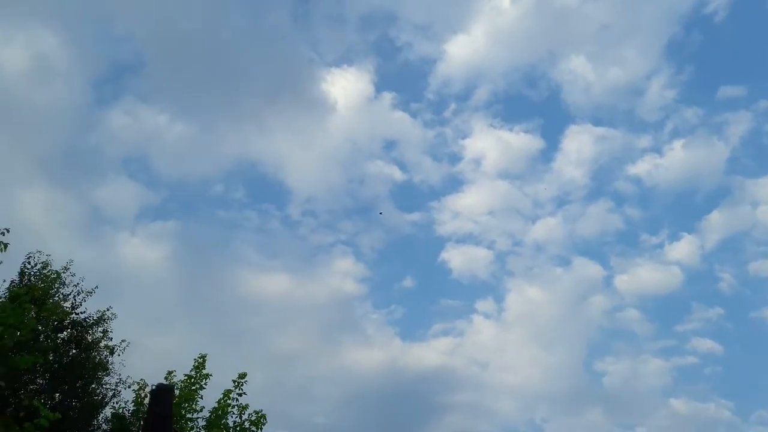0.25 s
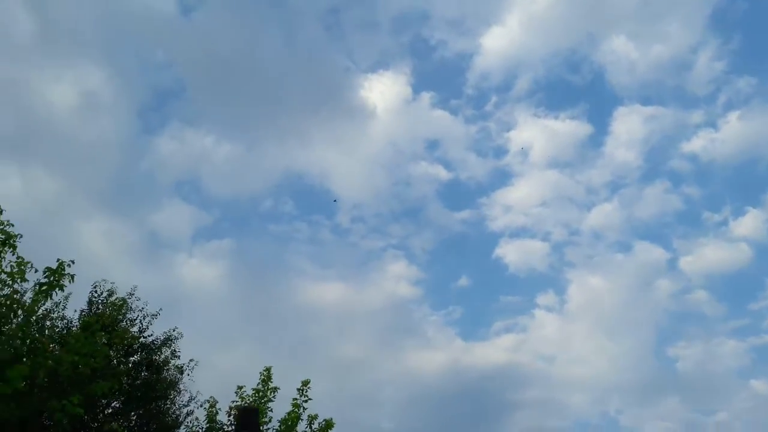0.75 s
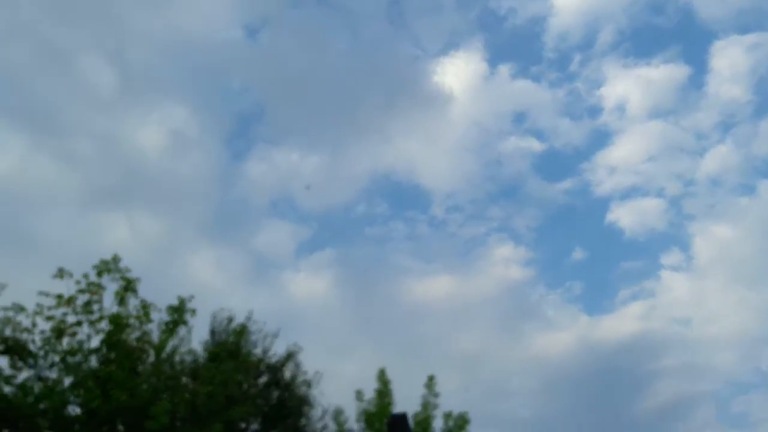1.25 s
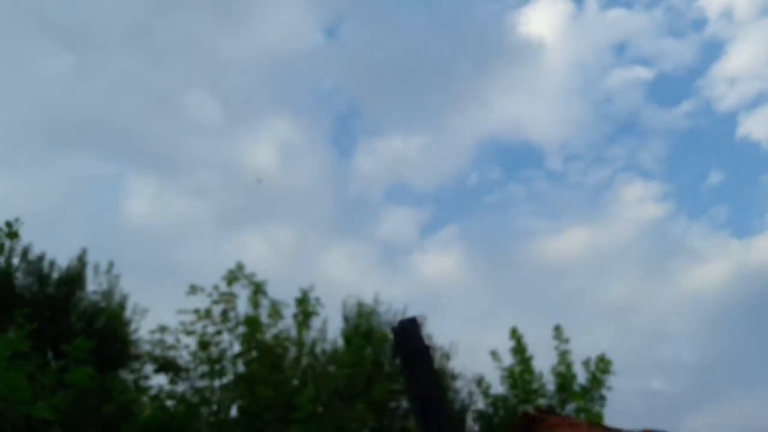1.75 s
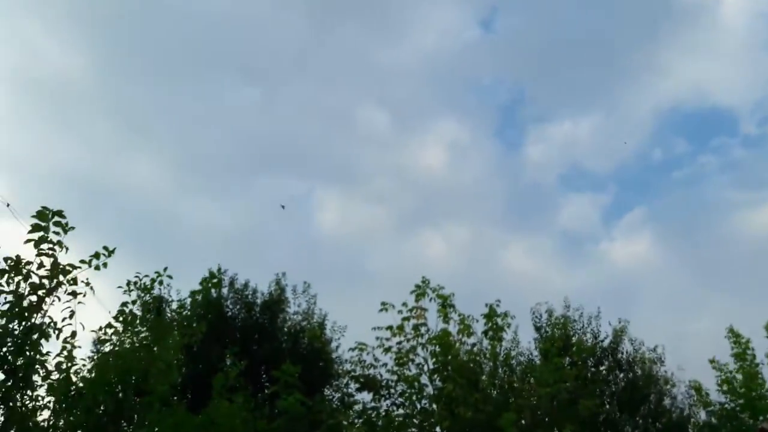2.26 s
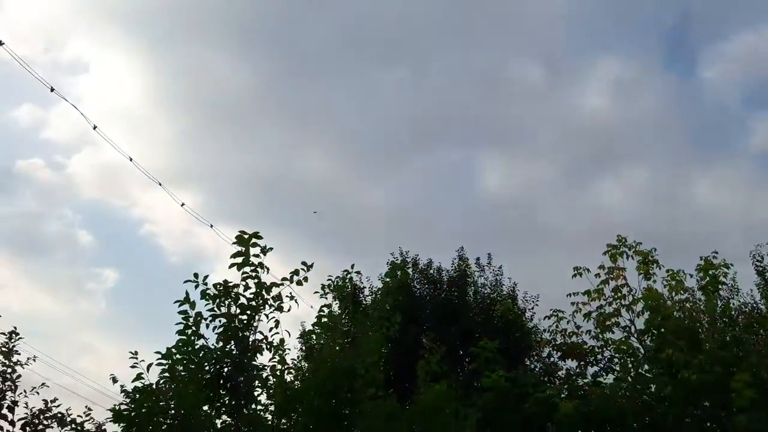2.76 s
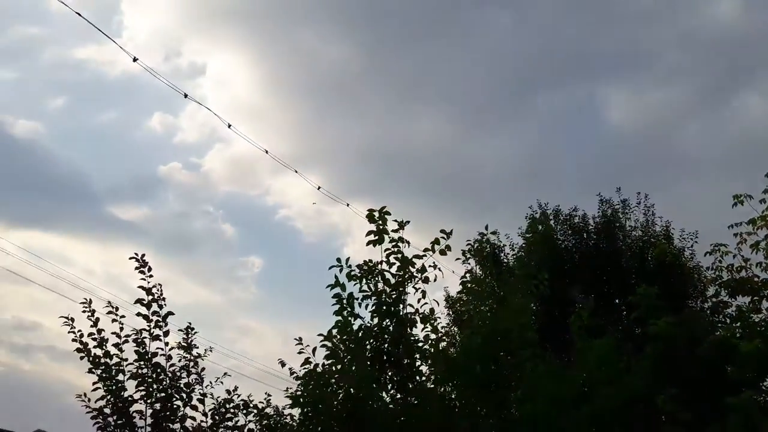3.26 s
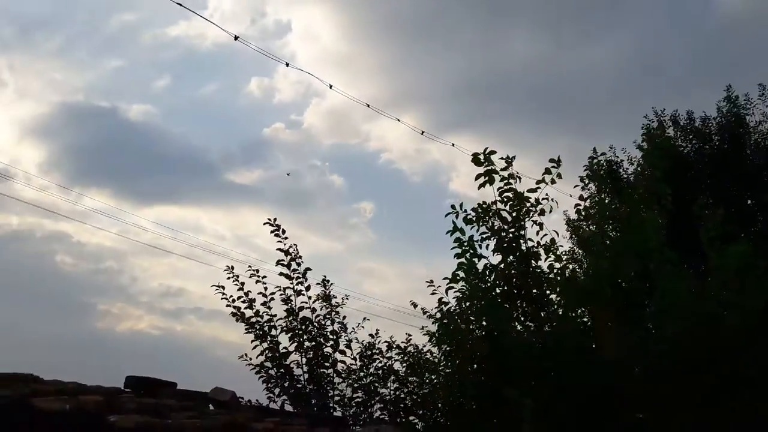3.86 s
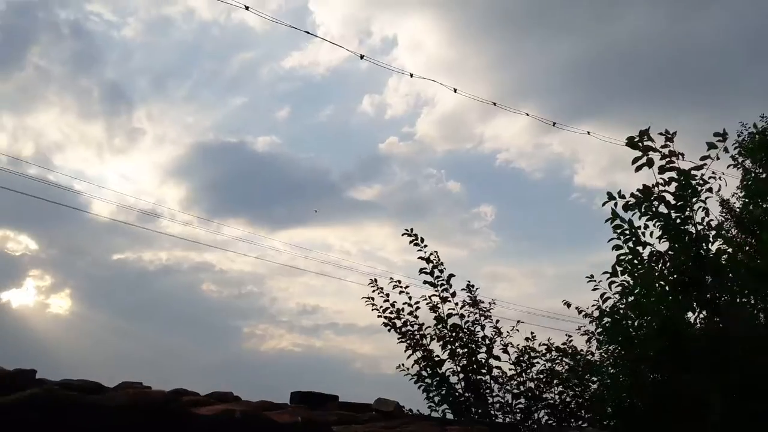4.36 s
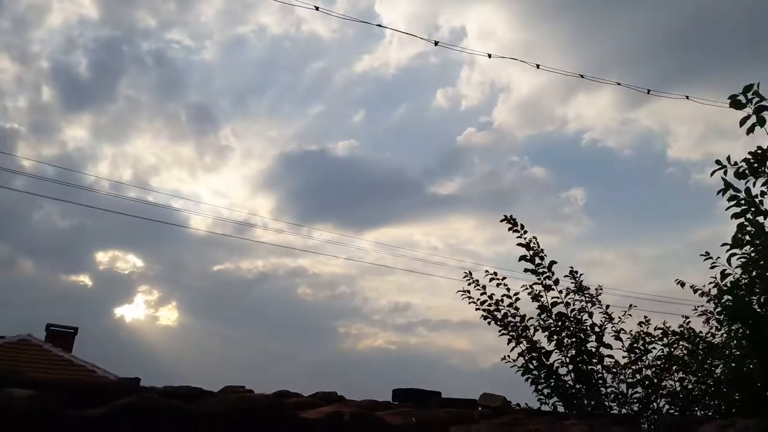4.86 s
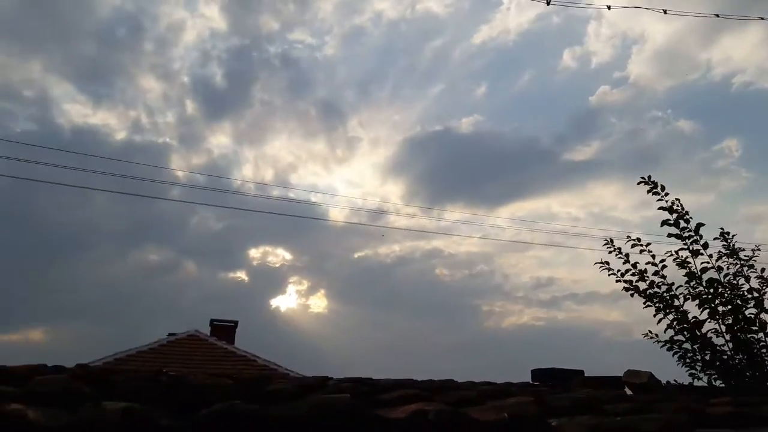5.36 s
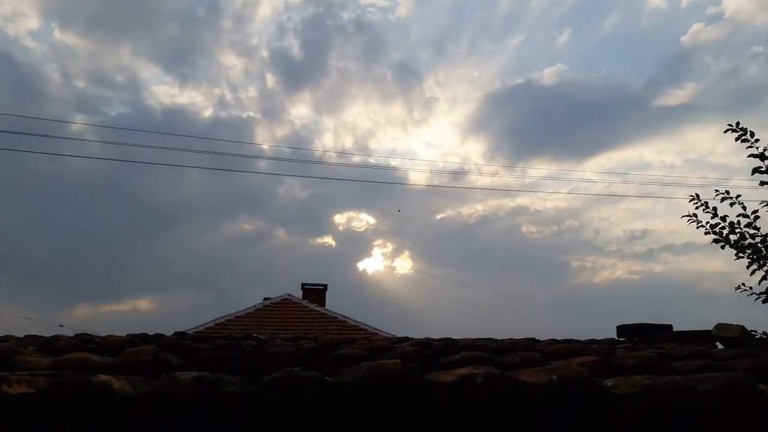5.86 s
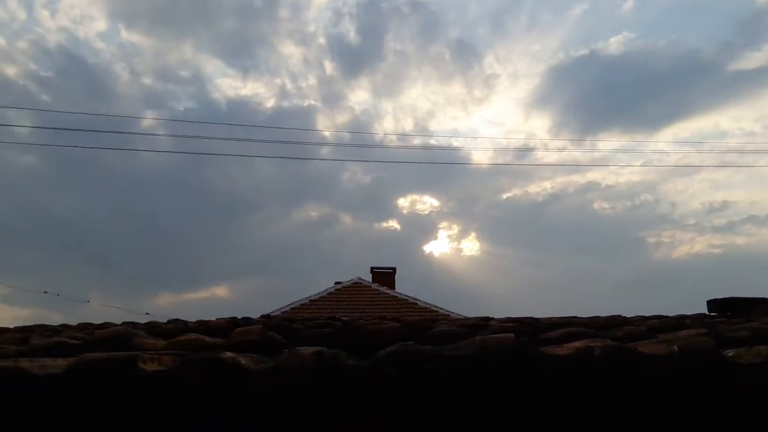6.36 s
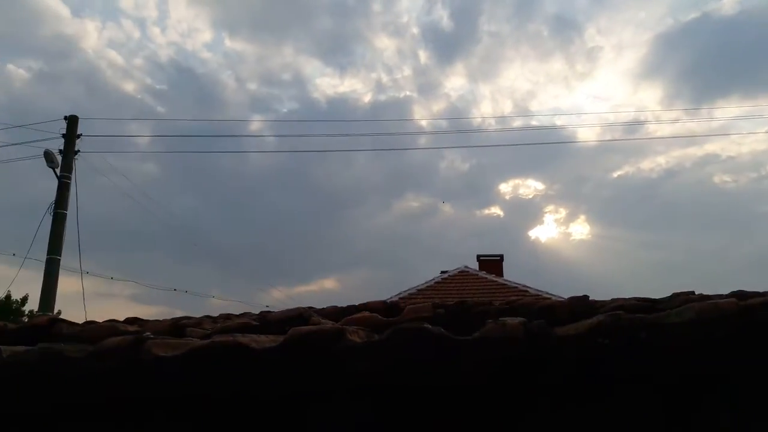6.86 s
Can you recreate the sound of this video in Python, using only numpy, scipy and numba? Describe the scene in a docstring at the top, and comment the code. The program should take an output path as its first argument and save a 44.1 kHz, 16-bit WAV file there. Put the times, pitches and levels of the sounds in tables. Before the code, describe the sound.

Faint young-pigeon peeps, wing rustles and claps over a low outdoor hum, then violent low wind buffeting swamps the microphone from about 5.2 seconds.

```python
"""Wind buffets the two microphone ports of a hand-held phone in a village yard under a pigeon loft.
Low-passed noise and torn pressure pulses make the wind; resonant noise makes wings rustle and clap.
Young pigeons peep with swept sines and hoarse noise chirps, an adult coos softly on a pitch and its octave.
Damped sines knock a wooden perch once; flickering noise bands are the village hum and microphone hiss."""
import sys
import numpy as np
from scipy import signal
from scipy.io import wavfile
from scipy.ndimage import uniform_filter1d
from numba import njit

SR = 44100
rng = np.random.default_rng(int(sys.argv[2]) if len(sys.argv) > 2 else 0)


def persist_wave(psi):
    """Save psi, clipped to +-1, as 16-bit WAV."""
    counts = np.round(np.clip(psi, -1, 1) * 32767).astype(np.int16)
    wavfile.write(sys.argv[1], SR, np.atleast_2d(counts).T)


N = 313110  # samples, 7.1 s

# whistles of young pigeons, levels ahead of the loft walls:
# (time [s], length [s], start [Hz], middle [Hz], end [Hz], level [dB])
PEEP_CALLS = [(0.0, 0.1, 5040, 4650, 4940, -67), (0.0, 0.1, 4170, 4170, 3950, -72),
              (0.1, 0.09, 4950, 4900, 4990, -72.5), (0.19, 0.05, 5050, 4880, 4740, -72),
              (0.259, 0.12, 4720, 4830, 4870, -64), (0.653, 0.096, 3820, 4100, 4300, -72),
              (0.756, 0.05, 5080, 4840, 4530, -71.5), (0.803, .07, 4260, 4420, 4610, -66),
              (0.806, 0.11, 4740, 4790, 4680, -74), (0.873, 0.086, 4520, 4380, 4260, -66.5),
              (0.973, 0.044, 4680, 4760, 4560, -66), (1.029, 0.034, 4260, 4260, 4150, -65.5),
              (1.782, 0.045, 4490, 4400, 4250, -69.5), (1.852, 0.016, 4500, 4540, 4630, -70),
              (2.17, 0.11, 4500, 4430, 4530, -72), (2.323, 0.05, 4680, 4590, 4610, -66.5),
              (2.389, 0.095, 4370, 4360, 4160, -71), (2.502, 0.053, 4680, 4790, 4730, -74),
              (2.587, 0.036, 4260, 4030, 3410, -66), (3.159, 0.042, 4030, 4070, 4270, -73),
              (3.216, 0.039, 3980, 4030, 4260, -69), (3.22, 0.21, 4850, 4880, 5070, -81),
              (3.337, 0.05, 4520, 4380, 4310, -73.5), (3.381, 0.14, 4530, 4500, 4620, -72.5),
              (3.455, 0.044, 4250, 4200, 4410, -68), (3.5, 0.062, 4490, 4500, 4500, -67.5),
              (3.568, 0.046, 4980, 4840, 4560, -67), (3.619, 0.038, 4470, 3740, 3470, -64.5),
              (3.84, 0.02, 3400, 3580, 3500, -66), (4.083, 0.14, 4150, 4360, 4450, -69.5),
              (4.238, 0.11, 4660, 4830, 4800, -72), (4.341, 0.068, 4370, 3900, 3860, -61.5),
              (4.419, 0.044, 3900, 4080, 3900, -64), (4.708, 0.049, 4440, 4360, 4360, -69),
              (5.43, 0.095, 3940, 4040, 3940, -74.5), (5.621, 0.097, 4240, 4440, 3940, -69),
              (5.737, 0.12, 4086, 4175, 4140, -67), (5.867, 0.068, 4290, 4210, 4100, -64.5),
              (5.42, 0.1, 4520, 4600, 4520, -76.5), (5.944, 0.12, 4040, 4010, 4040, -66.5),
              (6.08, 0.14, 4190, 4405, 4380, -63.5), (6.214, 0.038, 4500, 4160, 3770, -68),
              (6.716, 0.095, 4360, 4360, 4500, -71), (6.82, 0.12, 4410, 4380, 4590, -68.5),
              (6.96, 0.074, 4730, 5000, 4760, -72), (7.05, .06, 4170, 4200, 4250, -72)]


def undb(db):
    """Level definition: the amplitude gain of a level in dB."""
    return 10 ** (np.asarray(db) / 20)


def unit(x):
    """Normalization by the root mean square: scale to rms 1."""
    return x / np.sqrt(np.mean(x ** 2))


def curves(table):
    """Linear interpolation: columns of a table joined by straight lines, sample by sample."""
    s, *columns = np.transpose(table)
    return [np.interp(np.arange(N) / SR, s, column) for column in columns]


def sides(pan_db):
    """Power conservation: gains with left pan_db above right, for the power of unrelated ports."""
    left_power = undb(np.asarray(pan_db, float)) ** 2
    ratio = np.array([left_power, left_power ** 0])
    return np.sqrt(2 * ratio / (1 + left_power))


@njit
def svf(x, hz, damp):
    """Second-order resonance: state-variable filter with a moving centre; returns low, band and high."""
    y = np.empty((3, len(x)))
    band_state, low_state = 0., 0.
    for i in range(len(x)):
        g = np.tan(np.pi * hz[i] / SR)
        v = (band_state + g * (x[i] - low_state)) / (1 + g * (g + damp))
        low = low_state + g * v
        band_state, low_state = 2 * v - band_state, 2 * low - low_state
        y[0, i], y[1, i], y[2, i] = low, damp * v, x[i] - damp * v - low
    return y


def band(x, hz, width_hz):
    """Fixed resonance, gain 1 at the centre."""
    b, a = signal.iirpeak(hz, hz / width_hz, fs=SR)
    return signal.lfilter(b, a, x)


def twice_band(x, hz, width_hz):
    """Cascaded resonance: two equal passes steepen the skirts; the width is that of each pass."""
    return band(band(x, hz, width_hz), hz, width_hz)


def walk(rate):
    """Smoothed random process: levels held 1 / rate s and averaged twice; spread 1."""
    hold = int(SR / rate)
    steps = np.repeat(rng.standard_normal(N // hold + 1), hold)
    smooth = uniform_filter1d(uniform_filter1d(steps, hold), hold)[:N]
    return smooth / np.std(smooth)


def add(out, s, sound):
    """Linear superposition: mix a short sound in at time s."""
    i = max(int(s * SR), 0)
    n = max(min(sound.shape[1], N - i), 0)
    out[:, i:i + n] += sound[:, :n]


def buffeting(base_hz=290, octaves_per_db=0.05, burst_db=2.5, dips_per_s=70, dip_db=-7, dip_small=1.66):
    """Turbulence: eddies roll over each port alone and suck short dips; harder gusts make them smaller."""
    # wind on the ports ahead of their roll-off: (time [s], left level [dB], right level [dB])
    gust = [(0, -58, -62), (.55, -54, -48.5), (.68, -50, -43), (.76, -40, -35), (.85, -42.5, -48.5),
            (1.0, -55.5, -56), (1.36, -51, -48), (1.43, -46, -31), (1.5, -41, -31.5), (1.55, -36.5, -38),
            (1.65, -41, -39.5), (1.72, -42.5, -28), (1.78, -39, -34.5), (1.87, -39.5, -35.5),
            (2.0, -44.5, -45), (2.15, -65, -52), (2.3, -70, -69), (2.95, -57.5, -64), (3.3, -63, -70),
            (3.4, -44.5, -73), (3.52, -45, -44.5), (3.79, -41.5, -56), (3.9, -59, -62), (4.02, -49, -57.5),
            (4.44, -62, -66), (5.1, -62.5, -67), (5.22, -40, -38.5), (5.29, -26.5, -28.5), (5.35, -38, -41),
            (5.41, -33, -25), (5.45, -29, -18.5), (5.54, -28, -33), (5.58, -17.5, -23), (5.62, -22, -26.5),
            (5.71, -21, -28.5), (5.8, -36, -17.5), (5.85, -22, -22), (5.88, -27, -35), (5.92, -23.5, -25.5),
            (5.99, -29.5, -39), (6.11, -29.5, -56), (6.15, -24.5, -25.5), (6.19, -29, -14),
            (6.24, -31, -16.5), (6.28, -23.5, -20), (6.36, -25.5, -19.5), (6.4, -22.5, -30),
            (6.44, -21.5, -19), (6.5, -30.5, -30), (6.62, -32, -25.5), (6.66, -29, -31.5),
            (6.72, -32.5, -37), (6.78, -28, -30.5), (6.82, -17.5, -29), (6.86, -21, -24.5), (6.9, -15, -21),
            (6.96, -24.5, -27.5), (7.02, -28.5, -28), (7.1, -37.5, -31)]
    out = np.zeros((2, N))
    for port, gust_db in enumerate(curves(gust)):
        burst = burst_db * walk(30)
        strength_db = gust_db + 1.7 * burst + 24.0
        hz = np.clip(base_hz * 2 ** (octaves_per_db * strength_db), 135, 750)  # smaller is brighter
        roll = rng.standard_normal(N) / np.sqrt(hz)
        onsets = (rng.random(N) < dips_per_s / SR).astype(float)
        dips = -onsets * rng.exponential(1, N) / np.sqrt(hz)
        for damp in (1.2, 1.6, 1.6):  # air is smooth: both fall off steeply
            roll = svf(roll, hz, damp)[0]
            dips = svf(dips, dip_small * hz, damp)[0]
        air = unit(roll) + undb(dip_db) * unit(dips - dips.mean())
        out[port] = unit(air * undb(burst)) * undb(gust_db)
    return out


def tearing(pan_db=32.5):
    """Vortex shedding: each strong eddy is a suction pulse, far louder at one port."""
    # strongest eddies: (time [s], nominal level [dB], nominal pitch [Hz], port)
    strong = [(0.7434, -16, 184, "right"), (0.761, -16.5, 324, "right"), (1.421, -20.5, 223, "right"),
              (1.496, -27, 200, "right"), (1.697, -20, 200, "right"), (1.72, -22, 393, "right"),
              (1.7982, -17.5, 210, "left"), (5.415, -17.5, 296, "right"), (5.44, -17, 376, "right"),
              (5.4564, -15.5, 358, "right"), (5.558, -10.5, 223, "left"), (5.5673, -9, 243, "left"),
              (5.6383, -8, 226, "left"), (5.5781, -9, 416, "right"), (5.595, -15, 403, "left"),
              (5.602, -14.5, 480, "right"), (5.6207, -4, 300, "left"), (5.755, -18, 330, "right"),
              (5.769, -10.5, 304, "right"), (5.8037, -10, 219, "right"), (5.8981, -15, 223, "left"),
              (5.9457, -11.5, 203, "left"), (6.141, -13, 228, "right"), (6.16, -9, 148, "left"),
              (6.1842, -4.5, 330, "right"), (6.2304, -9.5, 383, "right"), (6.2486, -9, 390, "right"),
              (6.3058, -10.5, 500, "right"), (6.1962, -9, 305, "right"), (6.219, -7.5, 337, "right"),
              (6.2659, -4, 325, "right"), (6.3158, -7.5, 465, "right"), (6.3476, -12, 330, "right"),
              (6.374, -9.5, 337, "right"), (6.3871, -1.5, 317, "left"), (6.4189, -12, 188, "right"),
              (6.535, -16.5, 197, "left"), (6.588, -18.5, 280, "left"), (6.705, -16.5, 225, "left"),
              (6.6338, -14.5, 164, "right"), (6.6603, -12.5, 207, "left"), (6.8105, -7.5, 180, "left"),
              (6.84, -13.5, 337, "left"), (6.878, -9, 370, "right"), (6.8932, -12, 343, "left"),
              (6.9028, -12, 328, "left"), (6.9585, -3.5, 170, "left")]
    out = np.zeros((2, N))
    for s, db, hz, port in strong:
        gains = sides(pan_db if port == "left" else -pan_db)[:, None] / np.sqrt(2)
        t = np.arange(-1.5 / hz, 1.2 / hz, 1 / SR)
        # one suction dip between two humps
        hump = np.cos(2 * np.pi * 0.8 * hz * t) * np.exp(-(2.03 * hz * t) ** 2)
        # the sharp bottom where the eddy tears off
        cusp = np.exp(-(7.0 * hz * t) ** 2)
        # the torn edge rasps
        rasp = band(rng.standard_normal(len(t)), 2.46 * hz, 0.95 * hz)
        tear = band(rasp, 2.42 * hz, 0.73 * hz) * np.exp(-(0.92 * hz * t) ** 2)
        sharpness = max(1 + db / 35, 0)  # sharper when strong
        pulse = 0.65 * hump + sharpness * (0.59 * cusp + 0.44 * tear)
        add(out, s + t[0], -undb(db) * gains * pulse)
    return out


def wind(port_hz=78.3):
    """High-pass filtering: the ports weaken the lowest part of buffets and torn eddies."""
    port = signal.butter(3, port_hz, "high", fs=SR, output="sos")
    return signal.sosfilt(port, buffeting() + tearing())


def wings(scratch_db=1.5, own_db=2.0, wide=1.0, lag_s=.0001, swish_hz=6500, rise_over_fall=0.62):
    """Friction noise in resonances: feathers rustle and swish, roughened by quick scratches."""
    # broad feather resonances, lowest first: (centre [Hz], width [Hz], relative level [dB])
    feather = [(1036, 900, 2), (1950, 960, -2), (3000, 1960, -6.5)]
    # the steady stir of the loft: (time [s], rustle level [dB], swish level [dB])
    flock = [(0, -74, -71.5), (2.2, -66.5, -71), (3.9, -71, -74), (4.4, -62, -84), (5.0, -67.5, -73),
             (5.5, -60, -69), (7.1, -60.5, -68.5)]
    # wing strokes nearby: (peak time [s], fall time [s], rustle level [dB], swish level [dB],
    # lowest resonance relative to the rustle [dB])
    strokes = [(0.2, 0.052, -90, -65, -3), (1.03, 0.065, -62.5, -66, -1), (1.541, 0.051, -43.5, -64, -1.5),
               (1.6, 0.061, -54, -72, 4.5), (1.66, 0.027, -47, -74, 6.5), (1.958, 0.18, -55.5, -61, 0.5),
               (2.4, 0.052, -54.5, -64.5, -7), (2.8, 0.25, -59.5, -70, 0), (3.474, 0.029, -50, -70, -5),
               (3.64, 0.31, -59, -68.5, 3.5), (3.766, 0.051, -45, -60.5, 2.5), (4.26, 0.18, -56, -62.5, 0),
               (4.56, 0.15, -54, -64.5, -2.5), (5.143, 0.06, -54.5, -74, -6),
               (5.939, 0.072, -55, -69, -0.5), (6.266, 0.018, -48.5, -78, 6)]
    t = np.arange(N) / SR
    rustle_gain, swish_gain = undb(curves(flock))
    low_gain = rustle_gain
    for s, spread, rustle_db, swish_db, low_db in strokes:
        stroke = np.exp(-np.abs(t - s) / (spread * np.where(t < s, rise_over_fall, 1)))
        rustle_gain = np.hypot(rustle_gain, undb(rustle_db) * stroke)
        low_gain = np.hypot(low_gain, undb(rustle_db + low_db) * stroke)
        swish_gain = np.hypot(swish_gain, undb(swish_db) * stroke)

    scratch = undb(scratch_db * walk(160))  # shared by all resonances
    resonances = []
    for hz, width_hz, db in feather:
        own_scratch = undb(db + own_db * walk(120))
        # two passes of 1.53 times the width leave about the width itself
        noise = twice_band(rng.standard_normal((3, N)), hz, 1.53 * width_hz)
        resonances.append(own_scratch * noise)
    low, upper = resonances[0], sum(resonances[1:])
    near, left, right = low * low_gain / rustle_gain + upper
    late = np.roll(near, int(lag_s * SR))  # the shared part reaches the right port later
    rustle = np.array([near + wide * left, late + wide * right]) * scratch
    rustle /= np.std((low + upper)[0] * scratch) * np.hypot(1, wide)

    high = signal.butter(2, swish_hz, "high", fs=SR, output="sos")
    swish = unit(signal.sosfilt(high, rng.standard_normal((2, N))) * np.sqrt(scratch))
    return rustle_gain * rustle + swish_gain * sides(2.6)[:, None] * swish


def claps(rise_s=0.00058, ring_s=0.003, width=0.43, tail_db=-18, tail_s=0.017):
    """Impulsive excitation: an air pocket puffs out between wings; dry feather snaps tick and hiss."""
    # wing tips meeting: (time [s], peak level [dB], pitch [Hz])
    meetings = [(1.52, -36, 2080), (1.5335, -31.5, 2000), (1.5773, -38, 1750), (1.59, -41.5, 1600),
                (1.624, -36, 1770), (1.653, -31, 1770), (1.6584, -32, 1690), (1.664, -44, 3170),
                (1.6695, -28.5, 1770), (2.407, -49.5, 1410), (2.9306, -45, 1040), (3.483, -40.5, 1900),
                (3.7413, -36, 1340), (3.748, -34.5, 1200), (3.759, -32.5, 1250), (3.765, -34, 1290),
                (3.785, -40, 1400), (4.1407, -43, 1250), (4.232, -40.5, 1490), (4.41, -37.5, 1480),
                (4.5354, -45.5, 1670), (4.5817, -40, 1260), (5.133, -42, 1950), (5.1458, -43, 1940),
                (6.28, -30.5, 1220), (6.692, -44, 2000), (6.706, -43.5, 1400), (6.985, -46, 1880)]
    # thin bright ticks: (time [s], nominal level [dB], fade [ms])
    snaps = [(0.127, -55, 5.5), (0.2866, -50.5, 3), (0.981, -56, 4), (2.2975, -50, 2.3), (4.143, -51, 3.9),
             (4.4109, -31.5, 0.65), (4.527, -54, 14), (4.539, -41.5, 1.7), (4.5814, -51, 6.6),
             (4.682, -48, 1.2), (4.777, -56, 23), (5.41, -54, 3)]
    out, t = np.zeros((2, N)), np.arange(2600) / SR
    for s, db, hz in meetings:
        noise = rng.standard_normal((2, len(t)))
        puff = (noise[0] + 0.7 * noise) * (1 - np.exp(-t / rise_s)) * np.exp(-t / ring_s)
        pocket = twice_band(puff, hz, width * hz)
        add(out, s, undb(db) * pocket / np.abs(pocket).max())
    for s, db, fade_ms in snaps:
        noise = rng.standard_normal((2, len(t)))
        fade = np.exp(-1000 * t / fade_ms) + undb(tail_db) * np.exp(-t / tail_s)
        fade *= 1 - np.exp(-1000 * t / (0.27 * fade_ms))  # the longer, the softer it sets in
        snap = band(0.23 * noise[0] + noise, 7000, 12400) * fade
        add(out, s, undb(db) * sides(1.7)[:, None] * snap)
    return out


def calls(rows, waver_hz, waver_rate, flutter_db, fade_s, swell_db):
    """Frequency modulation: sing rows of (s, length s, pitch path Hz, dB, octave dB) with soft ends."""
    waver = waver_hz * walk(waver_rate)
    flutter = undb(flutter_db * walk(waver_rate))
    out, t = np.zeros(N), np.arange(N) / SR
    for s, length, path_hz, db, octave_db in rows:
        span = slice(max(int((s - fade_s) * SR), 0), int((s + length + fade_s) * SR))
        u = np.clip((t[span] - s) / length, 0, 1)
        points = len(path_hz)
        path = np.polyfit(np.linspace(0, 1, points), path_hz, points - 1)
        phase = 2 * np.pi * np.cumsum(np.polyval(path, u) + waver[span]) / SR
        edge_s = np.minimum(t[span] - s, s + length - t[span])
        gate = np.clip(edge_s / fade_s + 1, 0, 1) * undb(swell_db * (u - .5))  # grows towards the end
        tone = undb(db) * np.sin(phase) + undb(octave_db) * np.sin(2 * phase)
        out[span] += np.sqrt(2) * gate * flutter[span] * tone
    return out


def loft(x, loft_db=-3, loft_t60_s=0.21):
    """Reverberation: the loft walls smear a call, differently for each port."""
    t = np.arange(12000) / SR
    walls = rng.standard_normal((2, len(t))) * 1000 ** (-t / loft_t60_s)
    energy = np.sum(walls ** 2, axis=1, keepdims=True)
    walls = undb(loft_db) * walls / np.sqrt(energy)
    return x + signal.fftconvolve(x[None], walls, axes=1)[:, :N]


def scattered_chirps(count=40, chirp_db=-72, spread_s=0.13):
    """Random scatter: faint hoarse chirps at random delays after randomly picked peep starts."""
    pick, late, length, pitch, glide = rng.random((count, 5)).T
    starts = np.array([row[0] for row in PEEP_CALLS])
    s = starts[(pick * len(PEEP_CALLS)).astype(int)] + spread_s * late
    from_hz = 4000 + 1000 * pitch
    to_hz = from_hz + 1100 * (glide - .65)
    return list(zip(s, 0.028 + 0.024 * length, from_hz, to_hz, np.full(count, chirp_db)))


def peeps(octave_db=-15, waver_hz=43.6, swell_db=2.5, pan_db=7.5):
    """Harmonic and noise sources: thin whistles with a weak octave, and hoarse chirps of gliding noise."""
    # hoarse chirps, levels ahead of the loft walls:
    # (time [s], length [s], start [Hz], end [Hz], level [dB])
    hoarse = [(0.492, 0.046, 5170, 3870, -65), (0.524, 0.038, 3880, 2940, -65),
              (1.108, 0.065, 4800, 3100, -69), (1.293, 0.023, 5100, 3700, -74),
              (1.31, .025, 3800, 4600, -71), (1.366, 0.051, 3230, 3800, -69),
              (1.879, 0.057, 4430, 5100, -65.5), (1.944, 0.047, 4900, 4030, -67),
              (1.987, 0.05, 4500, 4570, -67.5), (2.808, 0.051, 4470, 3200, -67),
              (5.63, 0.07, 4750, 4750, -71), (5.86, .07, 4700, 5200, -69),
              (6.051, 0.054, 4500, 4700, -66.5), (6.48, .025, 4500, 4000, -70),
              (6.64, 0.028, 4450, 4450, -71), (6.705, 0.072, 4440, 4730, -63.5),
              (6.888, 0.059, 5160, 3170, -60.5), (7.064, 0.026, 5230, 4800, -62)]
    rows = [(s, length, path_hz, db, db + octave_db) for s, length, *path_hz, db in PEEP_CALLS]
    x = calls(rows, waver_hz, 120, 2.2, 0.011, swell_db)
    for s, length, from_hz, to_hz, db in hoarse + scattered_chirps():
        u = np.arange(0, 1, 1 / (length * SR))
        rasp = svf(rng.standard_normal(len(u)), from_hz + (to_hz - from_hz) * u, 0.057)[1]
        chirp = undb(db) * unit(rasp) * np.sin(np.pi * u)
        add(x[None], s, chirp[None])
    return sides(pan_db)[:, None] * loft(x)


def coos(waver_hz=3.6, swell_db=6, pan_db=5.4):
    """Acoustic filtering: the closed throat passes only the pitch and its octave."""
    # adult pigeon, levels ahead of the loft walls:
    # (time [s], length [s], start [Hz], end [Hz], level [dB], octave level [dB])
    adult = [(2.248, 0.057, 276, 254, -75, -67), (2.377, 0.066, 273, 269, -66, -63.5),
             (2.539, 0.063, 221.3, 208.6, -67, -60), (2.634, 0.051, 220.4, 234.5, -53.5, -61.5),
             (4.145, 0.024, 239, 231.5, -61.5, -63), (4.29, 0.012, 224.5, 211, -61.5, -54),
             (4.352, 0.1, 216.7, 230, -59, -50), (5.41, 0.14, 223, 223, -63, -49.5)]
    rows = [(s, length, path_hz, db, octave_db) for s, length, *path_hz, db, octave_db in adult]
    return sides(pan_db)[:, None] * loft(calls(rows, waver_hz, 40, 2.9, 0.03, swell_db))


def knock(time_s=2.772, level_db=-38.5, bounces=((0, -5), (.011, 0), (.018, -4), (.04, -12)),
          rattle_db=-24, rattle_t60_s=1.0):
    """Modal decay: a landing foot strikes the perch and bounces (delay s, dB); the boards rattle on."""
    # modes of the wooden perch: (frequency [Hz], level [dB], t60 [s])
    modes = [(216, -4, 0.3), (337, 3, 0.065), (1042, -5.5, 0.042), (2300, -15.5, 0.05)]
    out, t = np.zeros((2, N)), np.arange(9000) / SR
    ring = sum(undb(db) * np.sin(2 * np.pi * hz * t) * 1000 ** (-t / t60) for hz, db, t60 in modes)
    for delay, db in bounces:
        add(out, time_s + delay, undb(level_db + db) * np.array([ring, ring]))
    # noise around the upper modes
    rattle = unit(sum(band(rng.standard_normal(len(t)), hz, 0.4 * hz) for hz, _, _ in modes[2:]))
    rattle = rattle * 1000 ** (-t / rattle_t60_s)
    add(out, time_s, undb(level_db + rattle_db) * np.array([rattle, rattle]))
    return out


def yard(alike_hz=1300, treble_follow=.3):
    """Spatial coherence: half-octave bands flicker alone, bass alike at both ports; hiss hardly swells."""
    # spectrum of hum and hiss: (frequency [Hz], relative density [dB per Hz])
    spectrum = [(29, -42), (50, -19), (85, 28.5), (244, -0.5), (513, 0), (1310, -16), (1880, -20),
                (4900, -25), (6850, -46), (8110, -49), (9820, -61), (15500, -49)]
    # the village hum swells and sinks; the mean sets the overall level: (time [s], level [dB])
    hum = [(0, -56.5), (.5, -58), (.95, -53.5), (1.3, -58), (2.0, -57.5), (3.2, -62.5), (3.95, -59),
           (4.4, -57), (5.0, -58), (7.1, -55)]
    out = 0
    f, level = np.transpose(spectrum)
    hum_db, = curves(hum)
    for hz in 140 * 2 ** np.arange(.5, 7, .5):
        mid, side = twice_band(rng.standard_normal((2, N)), hz, hz / 2)
        swell = np.clip(2500 / hz, treble_follow, 1) * (hum_db - hum_db.mean())
        flicker = np.clip(600 / hz, .6, 2.5) * walk(14)
        db = np.interp(np.log(hz), np.log(f), level) + swell + flicker
        opposite = side * np.array([[1], [-1]])
        out = out + undb(db) * (mid + min(hz / alike_hz, 1) * opposite)
    return unit(out) * undb(hum_db.mean())


def scene():
    """Superposition: everything that reaches the two ports."""
    return wind() + wings() + claps() + peeps() + coos() + knock() + yard()


def record(dry, top_hz=15800):
    """Low-pass filtering: the phone cuts the top."""
    return signal.sosfilt(signal.ellip(10, .2, 70, top_hz, fs=SR, output="sos"), dry)


dry = scene()
out = record(dry)
persist_wave(out)
```